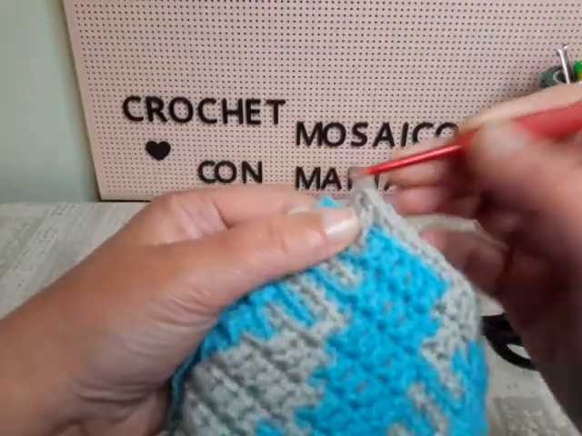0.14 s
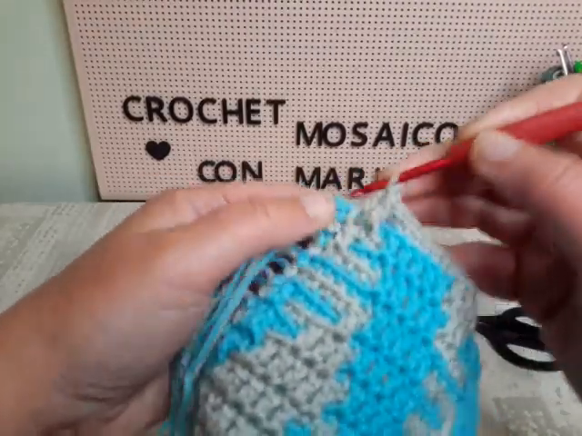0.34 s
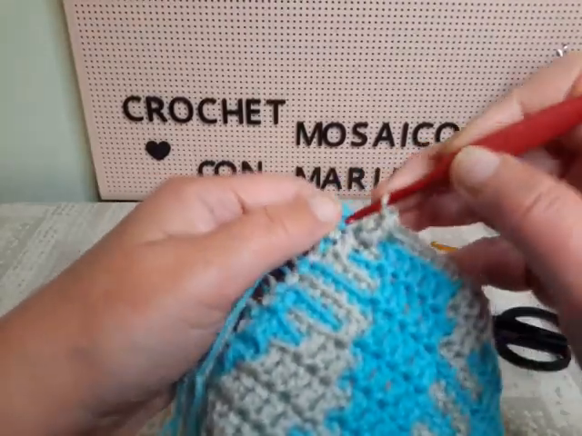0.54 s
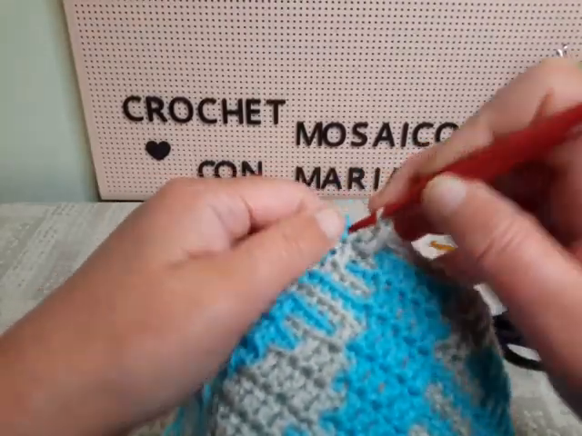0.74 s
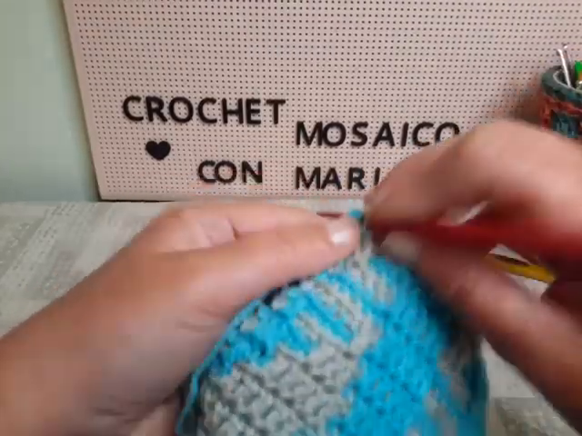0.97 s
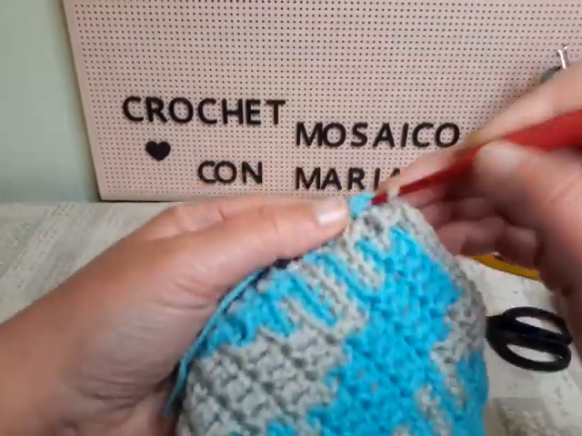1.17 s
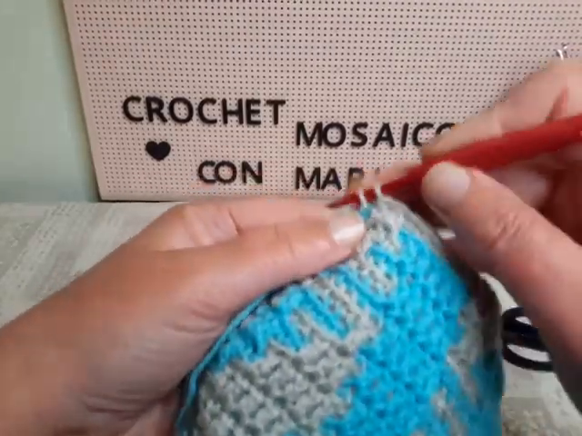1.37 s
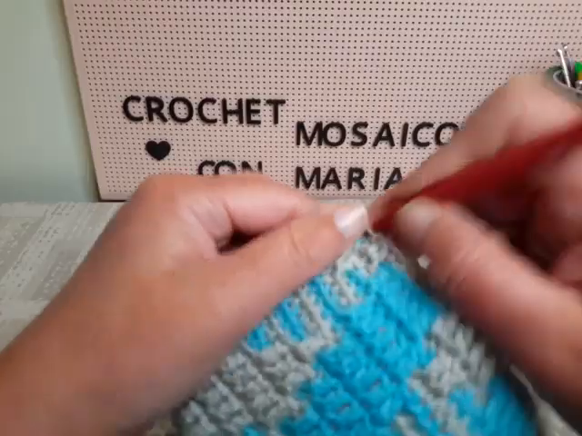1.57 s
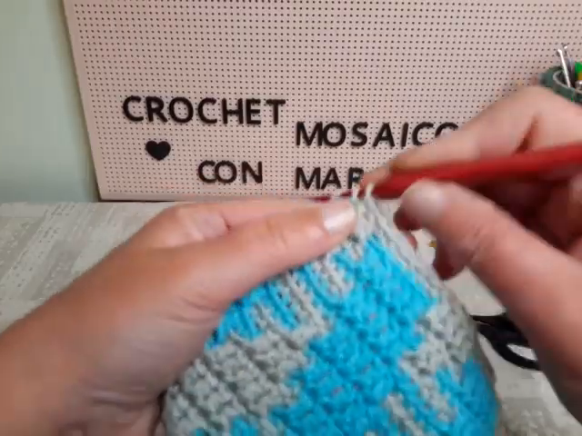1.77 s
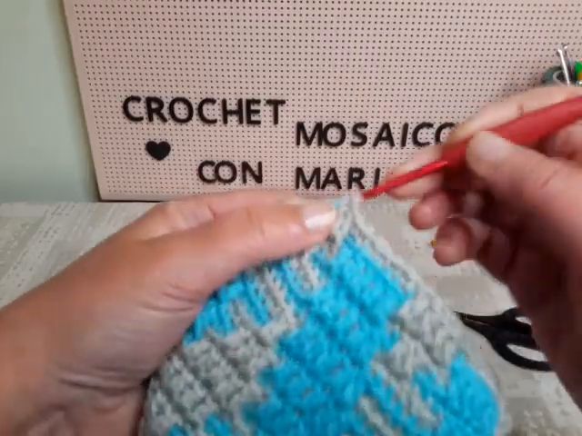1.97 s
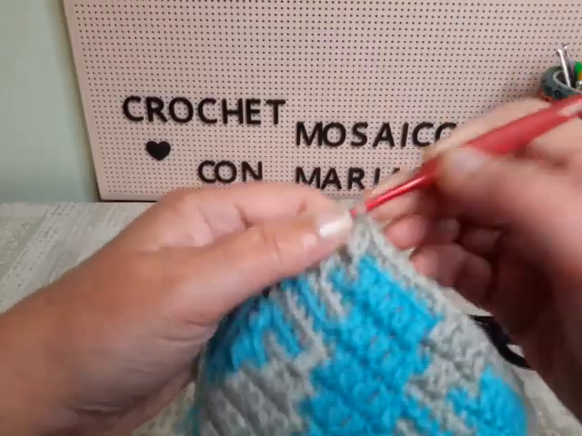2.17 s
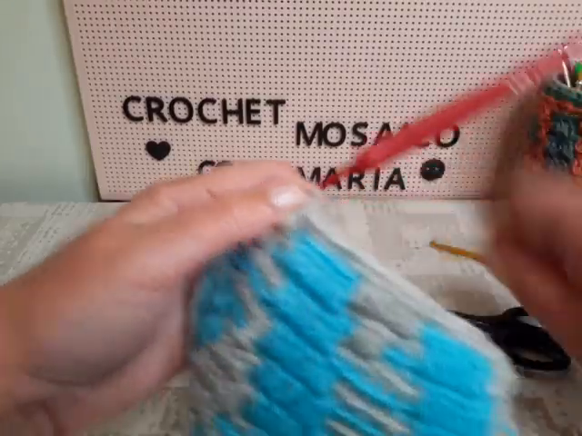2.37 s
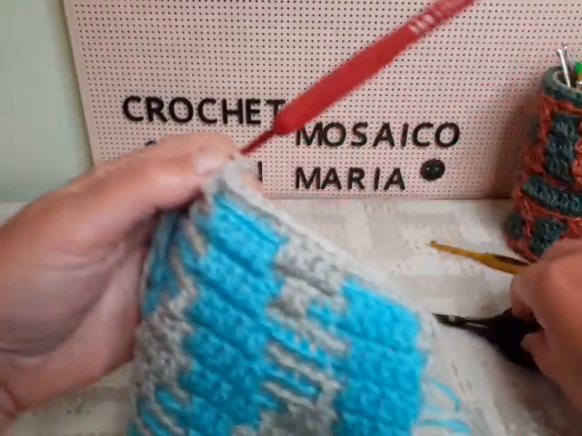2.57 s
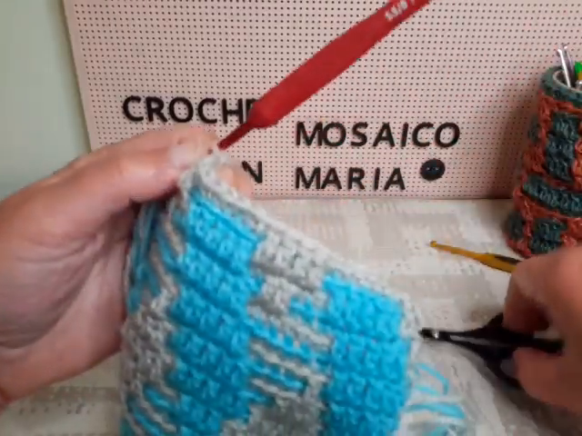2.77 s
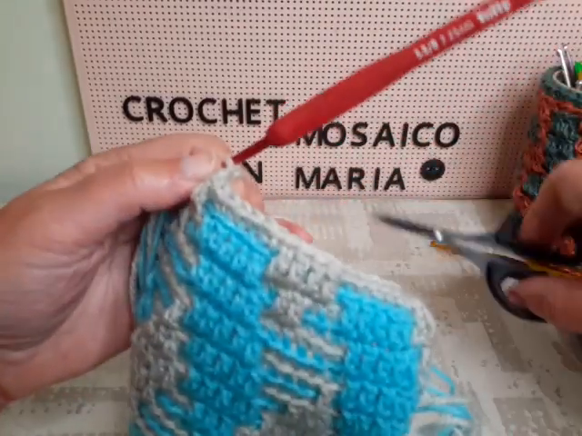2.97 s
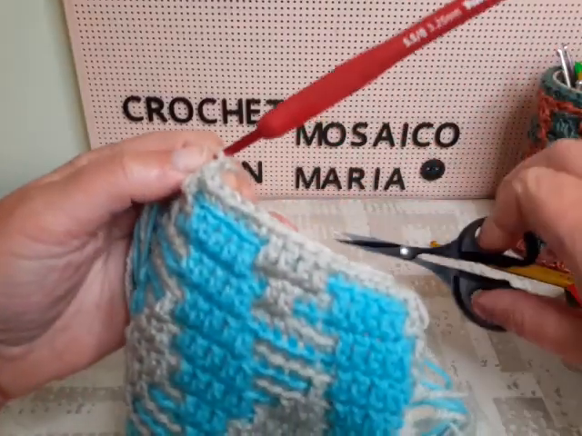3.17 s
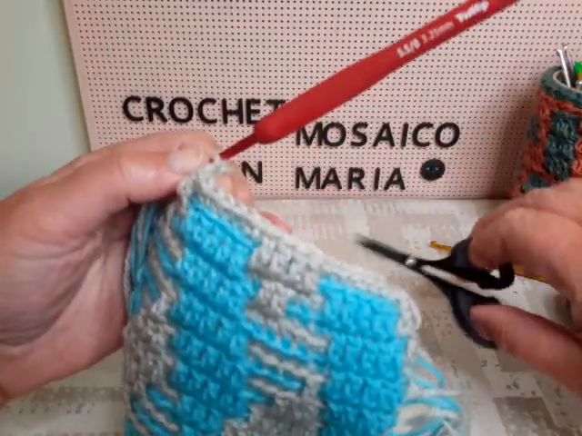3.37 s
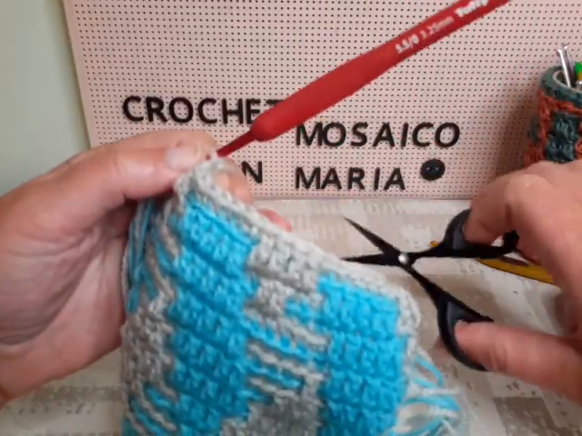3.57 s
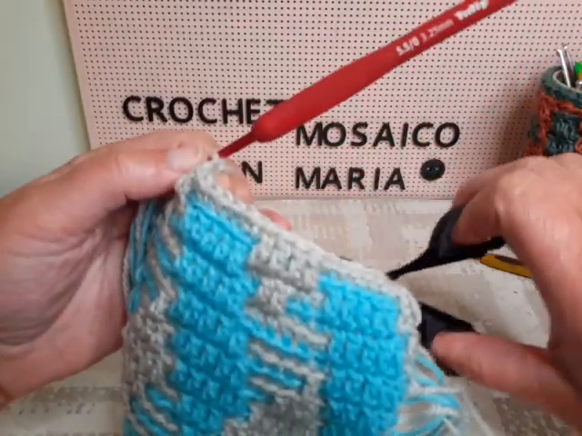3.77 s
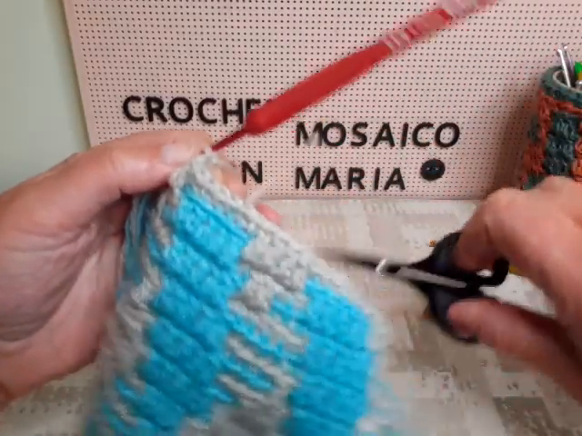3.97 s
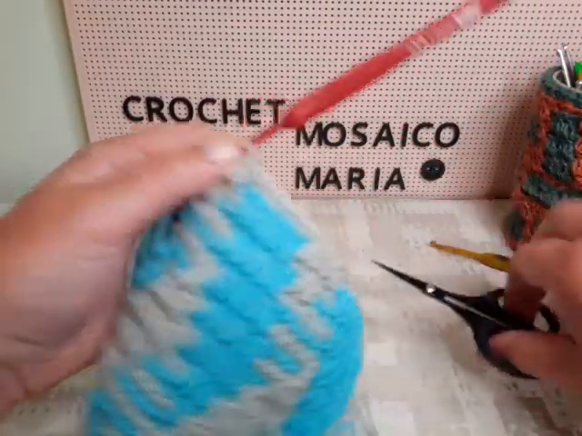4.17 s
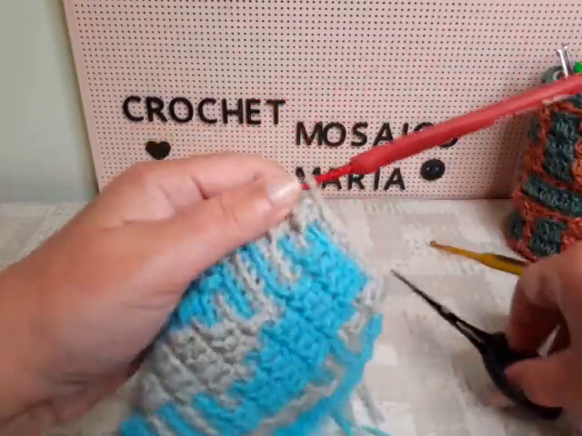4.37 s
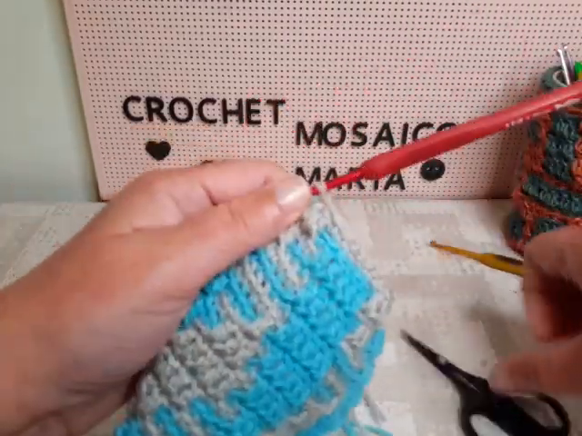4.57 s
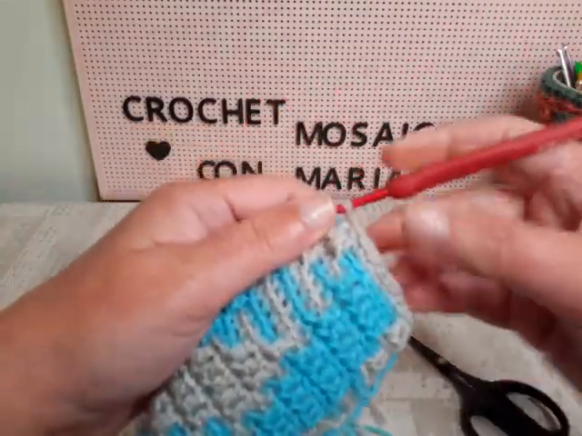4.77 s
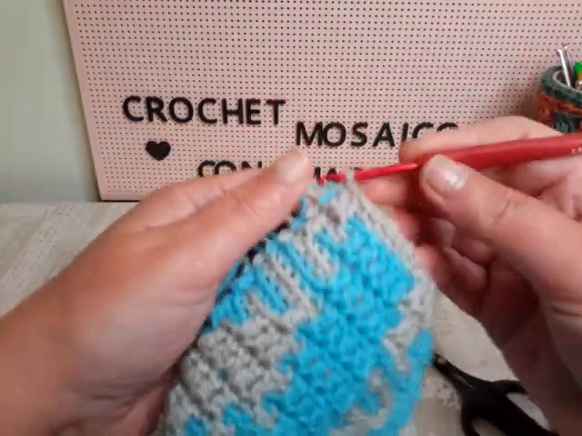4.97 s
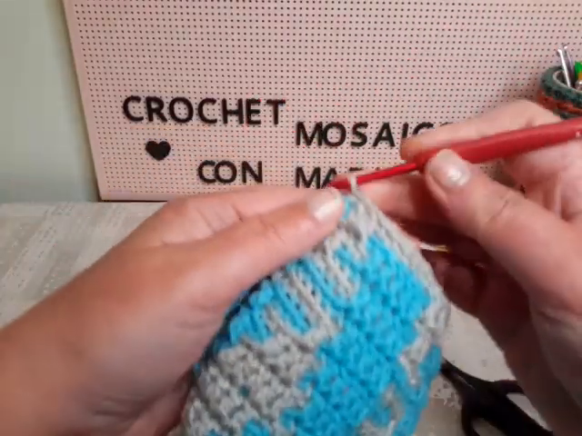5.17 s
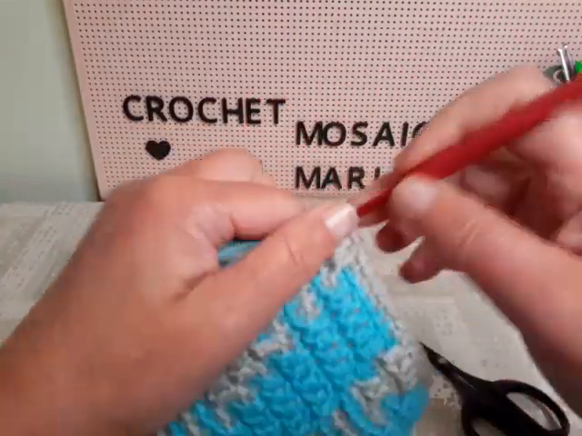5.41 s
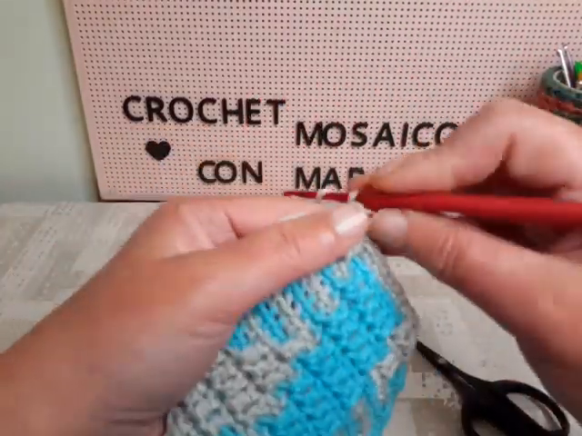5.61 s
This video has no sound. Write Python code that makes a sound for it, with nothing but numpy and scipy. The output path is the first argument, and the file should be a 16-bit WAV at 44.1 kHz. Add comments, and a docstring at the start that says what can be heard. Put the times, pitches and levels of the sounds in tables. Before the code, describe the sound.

In a quiet small room, a crochet hook rubs faintly through yarn. Small scissors knock lightly and scrape on a cloth-covered table as they are picked up. After a pause they snip one strand with a crisp click, then drop back with a louder clatter of steel and plastic, quickly rocking to rest over a hollow thump from the tabletop. The microphone is close.

```python
"""Small scissors clatter up off a cloth-covered table, drag across it, snip one strand and drop back down.
Plastic loops and steel blades knock, bounce and rock to rest, each ringing with its own resonances,
while the tabletop booms underneath. The snip is a short shear of fibres, a click and a thud in the hand.
Behind them, in the hush of a small room, a crochet hook rubs faintly through yarn in many tiny slips."""
import sys
import numpy as np
from scipy import signal
from scipy.io import wavfile

SR = 44100
rng = np.random.default_rng(int(sys.argv[2]) if len(sys.argv) > 2 else 0)


def bounce(signal):
    """Save signal as a 16-bit WAV file at the path given by the first command-line argument."""
    frames = np.transpose(np.atleast_2d(signal))
    limited = np.clip(frames, -1, 1)
    pcm = np.round(limited * 32767).astype(np.int16)
    wavfile.write(sys.argv[1], SR, pcm)


N = 248749
TIME = np.arange(N) / SR
EDGES = 22 * 2 ** (np.arange(30) / 3)   # third-octave bands [Hz]
CENTRES, WIDTHS = np.sqrt(EDGES[1:] * EDGES[:-1]), np.diff(EDGES)

# room tone: (frequency [Hz], density [dB])
AIR_COLOUR = [(15, -39), (25, -13.5), (33, -21.5), (82, -2.5), (144, -1), (169, -2), (267, -3.5),
              (582, -8.5), (631, -10), (684, -8.5), (1170, -17), (1340, -16), (6550, -32.5), (15500, -36.5)]
# reverb tail: (frequency [Hz], t60 [s])
ROOM_DECAY = [(100, 0.38), (500, 0.55), (1500, 0.37), (5000, 0.39), (12000, 0.27)]
# yarn over fingers, hook in a stitch, scissors on the table, blades through the strand:
# (peak time [s], level [dB], half-length [s])
YARN_SLIDES = [(1.12, -78.5, 0.28), (1.8, -80.5, 0.48), (2.57, -76.5, .06), (5.13, -79, 0.16)]
HOOK_PULLS = [(.015, -71, .02), (.342, -64, 0.018), (.97, -72, 0.13), (1.083, -68.5, 0.022),
              (1.32, -68, 0.024), (1.36, -63, 0.017), (2.092, -60.5, .013)]
DRAG_SHOVES = [(2.772, -49, 0.014), (2.808, -54, 0.025), (2.87, -49.5, 0.016)]
SHEAR_STROKES = [(4.055, -61.5, 0.015)]
# tone of those four rubs: (frequency [Hz], density [dB])
YARN_TONE = [(500, -6.5), (1400, 2.5), (2000, -1), (3200, 2.5), (5200, -4), (6500, -15.5), (15000, -20)]
HOOK_TONE = [(300, 1), (600, -12), (810, 10), (1100, 0.5), (1400, 7), (1800, -14), (2400, -6.5),
             (3400, -15), (5300, -15), (6500, -41), (14000, -33)]
DRAG_TONE = [(50, -24), (110, -5.5), (250, 0), (550, 3.5), (1000, -3), (1450, -4), (2000, -11),
             (2900, -13.5), (4500, -15.5), (6500, -33), (15000, -47)]
SHEAR_TONE = [(60, -18), (600, 3), (1200, -12), (1700, 2), (3300, -3), (4900, 2.5), (6200, -6), (7600, -10),
              (9000, -21), (13500, -25), (15500, -14)]
# plastic on table, steel on table, blade on blade: (frequency [Hz], density [dB])
PLASTIC_TONE = [(50, -20.5), (110, -5.5), (170, -5), (230, 4), (380, -3.5), (800, 4.5), (1400, -5),
                (2500, -4), (4600, -12.5), (6500, -39), (15500, -49.5)]
STEEL_TONE = [(50, -34.5), (110, -12.5), (170, -15.5), (220, -3), (450, 7.5), (800, -2), (1050, -0.5),
              (1450, -1.5), (2500, 0.5), (3600, -9.5), (4900, -5.5), (5900, -20), (7500, -20.5),
              (9000, -25.5), (15500, -38.5)]
CLICK_TONE = [(60, -5), (200, 4), (600, -9), (1200, -10), (1700, 4.5), (3300, -1), (4800, -1), (6200, -13),
              (7600, -15), (9000, -27), (15500, -30)]
# body peaks and notches of hook, handles and blades: (frequency [Hz], width [Hz], gain [dB])
HOOK_PEAKS = [(790, 77, 1.5), (996, 31, 7), (1163, 12, 11), (1266, 70, -10), (1355, 88, 8), (1494, 32, 8.5),
              (2363, 36, 9)]
HANDLE_PEAKS = [(112.4, 14, 10.5), (527, 18, 12), (750, 148, -5), (860, 76, 6), (1470, 120, 10.5),
                (1608, 75, -19.5), (2007, 85, 10), (2290, 200, -3.5), (2620, 90, 3), (2930, 200, 5)]
BLADE_PEAKS = [(820, 97, 4), (1264, 63, 5), (1466, 61, 7), (1630, 50, -3.5), (1860, 96, 3.5), (2270, 28, 2),
               (2450, 25, 8), (2497, 16, 4.5), (3330, 39, 8), (3520, 22, 6), (4500, 540, 7.5),
               (5180, 110, 3), (5580, 560, -10.5), (6670, 110, 5), (7670, 130, 4.5), (7450, 100, 6.5),
               (8750, 400, -15.5)]
# ringing modes of the tabletop: (frequency [Hz], gain [dB], t60 [s])
TABLE_MODES = [(113, -29, 0.13), (215.3, -14, 0.32), (236.3, -12, 0.41), (274.5, -13.5, 0.13),
               (322, -18.5, 0.15), (374, -13, 0.17), (430, -16.5, 0.35), (484, -16, 0.16), (527.5, 1, 0.24),
               (551.3, 0.5, 0.28), (628, -11, 0.12), (720, -3, 0.12), (735, -6, 0.089),
               (794.3, -12.5, 0.26), (852, -15, 0.272), (1432, -8.5, 0.092)]
# clicks of the held scissors and the parting strand:
# (time [s], level [dB], tilt [dB/octave], t60 [s], thud [dB])
HAND_CLICKS = [(3.007, -57, -4, 0.0058, -45), (4.0558, -62, 1, 0.0074, -48),
               (4.0806, -42.5, -1, 0.015, -41), (4.091, -62.5, 7, .008, -70)]
# scissors hitting the table on pick-up and drop:
# (time [s], level [dB], tilt [dB/octave], t60 [s], push on the table [dB])
TABLE_HITS = [(2.6141, -38.5, -3, 0.029, -51), (2.619, -37, 1.5, 0.014, -54),
              (2.6442, -31.5, -0.5, 0.03, -44.5), (2.6556, -39.5, -4, 0.043, -43),
              (4.6903, -29.5, -2.5, 0.031, -36.5), (4.694, -21.5, -1.5, 0.023, -28),
              (4.7195, -18.5, 2.5, .022, -26), (4.7333, -27, -2, 0.076, -32.5),
              (4.77, -31.5, -6.5, 0.033, -32.5)]


def from_db(db):
    """Decibels to gain."""
    return 10 ** (np.asarray(db) / 20)


def at_hz(points, hz):
    """Read a curve on a log-frequency axis."""
    known, values = np.transpose(points)
    return np.interp(np.log(hz), np.log(known), values)


def band_gains(colour):
    """Gain per band that gives white noise this colour at about rms 1."""
    gains = from_db(at_hz(colour, CENTRES))
    return gains / np.sqrt(np.sum(gains ** 2 * WIDTHS) / (SR / 2))


def noise_bands(envelopes):
    """Third-octave bands of noise, each shaped in time before its filter."""
    out = np.zeros(N)
    white = rng.standard_normal(size=(3, N))   # neighbouring bands get unrelated noise
    for k, envelope in enumerate(envelopes):
        sos = signal.butter(2, [EDGES[k], EDGES[k + 1]], "band", fs=SR, output="sos")
        out += signal.sosfilt(sos, envelope * white[k % len(white)] + 1e-18)
    return out


def linger(power, t60):
    """Smear energy over an exponential decay."""
    pole = from_db(-120 / (t60 * SR))
    return signal.lfilter([1 - pole], [1, -pole], power + 1e-24)


def in_room(powers, wet_db, build_s=.027):
    """Band powers to sound: direct noise, plus a diffuse tail that blooms and dies."""
    wet = from_db(wet_db) ** 2
    return noise_bands(np.sqrt(power + wet * linger(linger(power, build_s), t60))
                       for power, t60 in zip(powers, at_hz(ROOM_DECAY, CENTRES)))


def resonate(x, peaks):
    """Colour a sound with the peaks and notches of a body."""
    for hz, width_hz, db in peaks:
        b, a = signal.iirpeak(hz, hz / width_hz, fs=SR)
        x = x + (from_db(db) - 1) * signal.lfilter(b, a, x)
    return x


def ring(force, hz, t60):
    """A unit push sets a mode ringing at height 1; slow forces radiate nothing."""
    radius, angle = from_db(-60 / (t60 * SR)), 2 * np.pi * hz / SR
    return signal.lfilter([.5, 0, -.5], [1, -2 * radius * np.cos(angle), radius ** 2], force + 1e-18)


def strokes(rows, shape=2.2):
    """Envelope of rubs, each a bell-shaped swell as the hand speeds up and slows."""
    return np.sqrt(sum(from_db(db) ** 2 * np.exp(-np.abs((TIME - s) / half_s) ** shape)
                       for s, db, half_s in rows))


def friction(level, colour, slips_per_s, spread_db, slip_t60):
    """Power per band of a rub: many tiny slips of uneven size."""
    slipping = rng.random(N) < slips_per_s / SR
    slips = slipping * from_db(spread_db * rng.standard_normal(N).clip(-2, 2)) ** 2
    grain = linger(slips / slips.mean(), slip_t60)
    return np.outer(band_gains(colour) ** 2, grain * level ** 2)


def cracks(rows, colour, shares, pivot_hz=1500):
    """Power per band of sharp transients, each with its own brightness and decay."""
    powers, age = np.zeros((len(CENTRES), N)), TIME[:SR // 10]
    octaves = np.log2(CENTRES / pivot_hz).clip(-2, 2)
    for (s, db, tilt_db, t60, _), share in zip(rows, shares):
        gains = band_gains(colour) * from_db(db + tilt_db * octaves)
        fade = from_db(-60 * age / t60)
        start = round(s * SR)
        powers[:, start:start + len(age)] += share * np.outer(gains, fade) ** 2
    return powers


def room_tone(level_db=-67):
    """A steady, dark bed of still air."""
    return from_db(level_db) * noise_bands(band_gains(AIR_COLOUR))


def hook_and_yarn(rest_db=-86):
    """Hollow rasp of the hook in the stitches, and the soft hiss of sliding yarn."""
    rasp = friction(strokes(HOOK_PULLS), HOOK_TONE, slips_per_s=1000, spread_db=3.5, slip_t60=.0082)
    yarn_level = np.hypot(strokes(YARN_SLIDES), from_db(rest_db))   # the yarn never lies quite still
    hiss = friction(yarn_level, YARN_TONE, slips_per_s=2500, spread_db=1.5, slip_t60=.012)
    return resonate(in_room(rasp + hiss, wet_db=-15), HOOK_PEAKS)


def bounces(touches=3, gap_s=.0104, shrink=.85, loss_db=12, push_loss_db=9.5):
    """Each hit and its quickening, weakening bounces, as rows like TABLE_HITS."""
    delays = np.cumsum([0] + [gap_s * shrink ** k for k in range(touches - 1)])
    return [(s + delay, db - k * loss_db, tilt_db, t60, push_db - k * push_loss_db)
            for s, db, tilt_db, t60, push_db in TABLE_HITS for k, delay in enumerate(delays)]


def rocking(taps=4, start_s=4.781, gap_s=.023, db=-43, push_db=-42.5, loss_db=9.5, tilt_db=-2.5, t60=.05):
    """The dropped scissors rock to rest in even, fading taps, as rows like TABLE_HITS."""
    return [(start_s + k * gap_s, db - k * loss_db, tilt_db, t60, push_db - k * loss_db)
            for k in range(taps)]


def hand_thuds(hz=267, t60=.011, cutoff_hz=1700):
    """Each click jolts the hand, whose soft grip dulls and damps it at once."""
    force = np.zeros(N)
    for s, *_, thud_db in HAND_CLICKS:
        force[round(s * SR)] += from_db(thud_db)
    grip = signal.butter(4, cutoff_hz, fs=SR, output="sos")
    return signal.sosfilt(grip, ring(force, hz, t60))


def tabletop(contacts, drag_db=-31.5):
    """Knocks and the sliding scissors set the board booming."""
    force = from_db(drag_db) * strokes(DRAG_SHOVES) * rng.standard_normal(N)
    for s, *_, push_db in contacts:
        force[round(s * SR)] += from_db(push_db)
    return sum((-1) ** k * from_db(db) * ring(force, hz, t60)
               for k, (hz, db, t60) in enumerate(TABLE_MODES))


def handles(contacts, plastic_share, cushion_s=.0064):
    """The plastic loops scrape and knock on the table; the cloth softens their attack."""
    drag = friction(strokes(DRAG_SHOVES), DRAG_TONE, slips_per_s=1200, spread_db=3, slip_t60=.008)
    knocks = linger(cracks(contacts, PLASTIC_TONE, plastic_share), cushion_s)
    return resonate(in_room(knocks + drag, wet_db=-6.5), HANDLE_PEAKS)


def blades(contacts, steel_share):
    """Fibres part under the closing blades, which meet with a click; dropped, the steel clatters."""
    shear = friction(strokes(SHEAR_STROKES), SHEAR_TONE, slips_per_s=3000, spread_db=2.5, slip_t60=.005)
    clicks = cracks(HAND_CLICKS, CLICK_TONE, np.ones(len(HAND_CLICKS)))
    clatter = cracks(contacts, STEEL_TONE, steel_share)
    return resonate(in_room(shear + clicks + clatter, wet_db=-8), BLADE_PEAKS)


def scene(let_go_s=4.6, held_steel=.043, dropped_steel=.86):
    """Mono mix over room tone: held, the scissors land mostly on plastic; dropped, mostly on steel."""
    bed = room_tone()
    contacts = np.array(bounces() + rocking())
    steel_share = np.where(contacts[:, 0] < let_go_s, held_steel, dropped_steel)
    scissors = handles(contacts, 1 - steel_share) + blades(contacts, steel_share) + hand_thuds()
    return (scissors + tabletop(contacts) + hook_and_yarn() + bed)[None]


def record(dry):
    """The electronics add a thin whine and a small DC offset; the top is cut."""
    whine_hz, whine_db, cutoff_hz, offset = 10900, -94.5, 15800, -.0005
    whine = from_db(whine_db) * np.sin(2 * np.pi * whine_hz * TIME)
    low_pass = signal.ellip(10, .1, 80, cutoff_hz, fs=SR, output="sos")
    return signal.sosfilt(low_pass, dry + whine) + offset


dry = scene()
out = record(dry)
bounce(out)
```